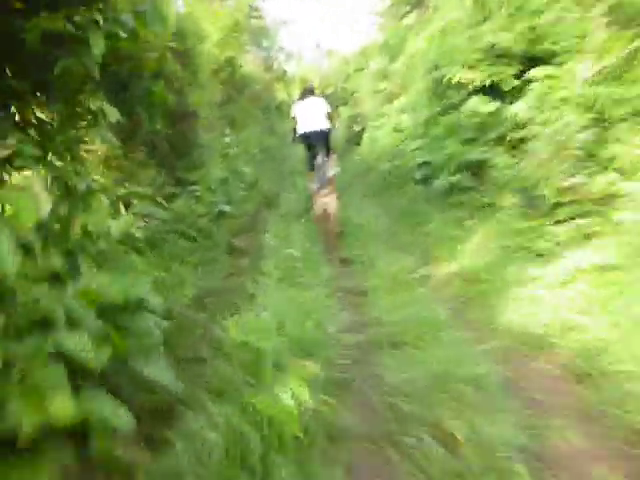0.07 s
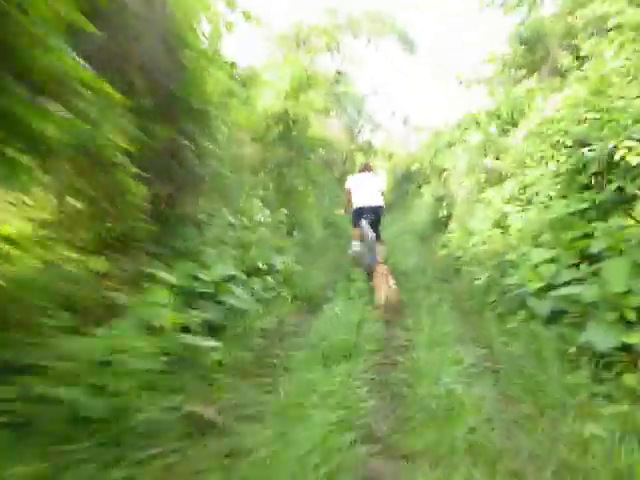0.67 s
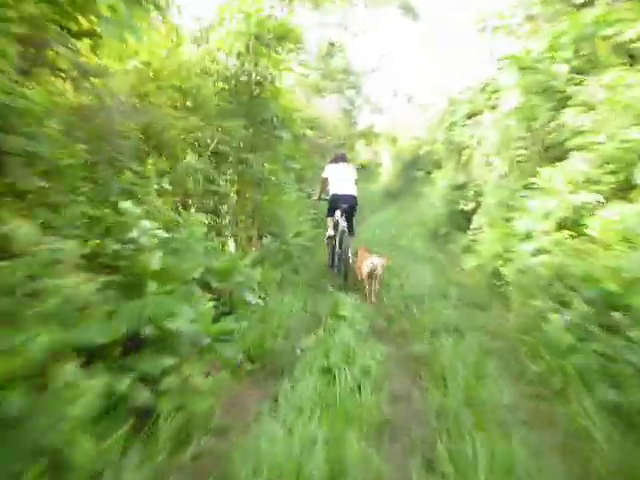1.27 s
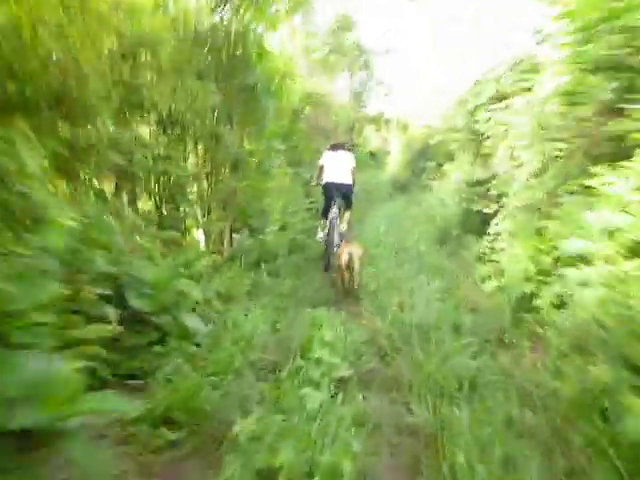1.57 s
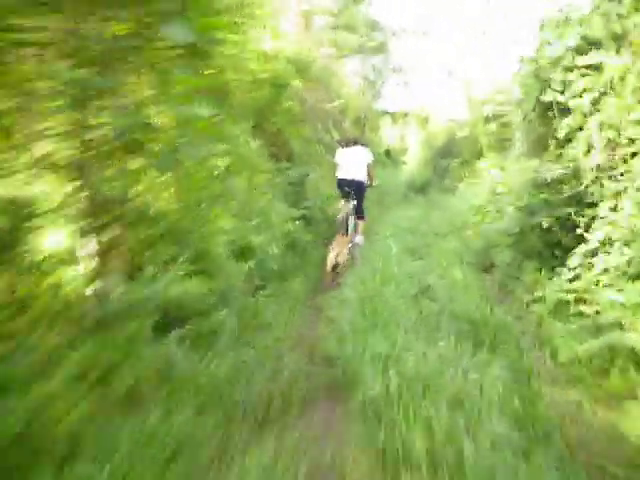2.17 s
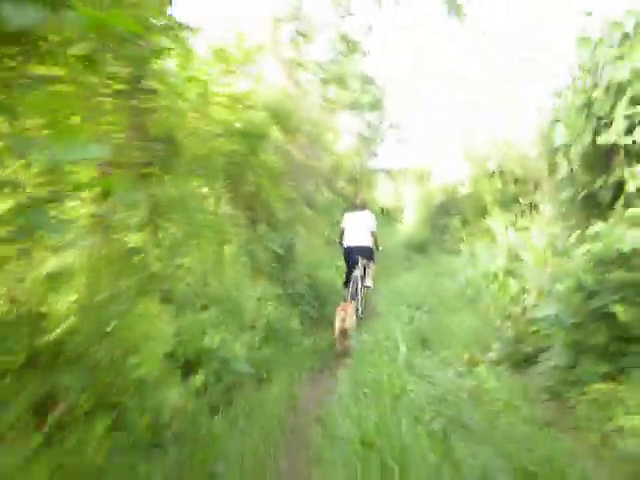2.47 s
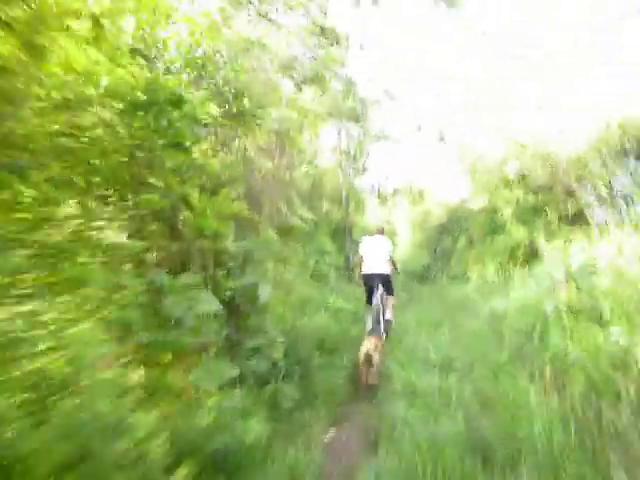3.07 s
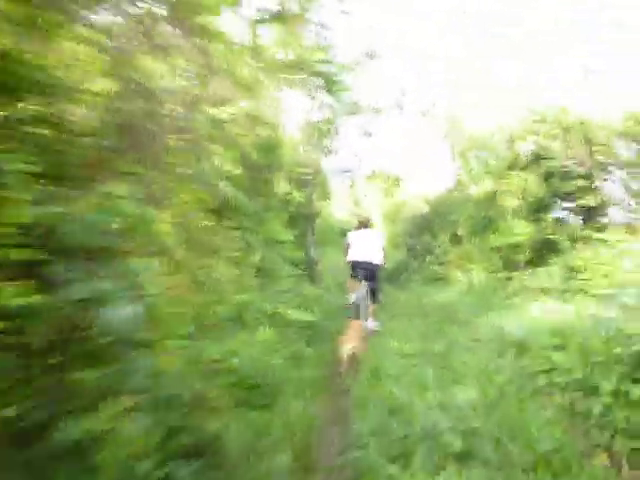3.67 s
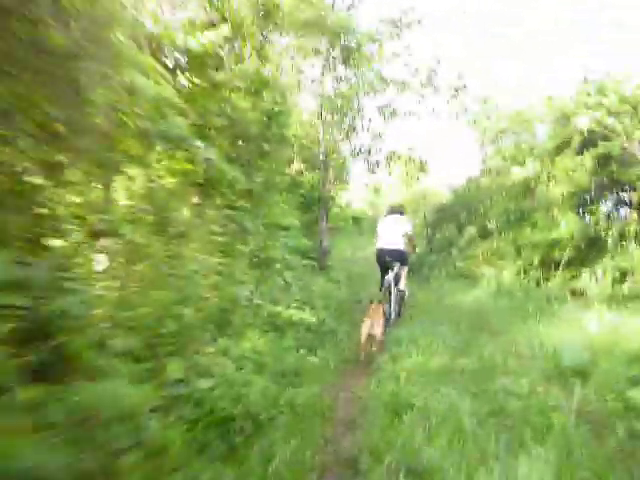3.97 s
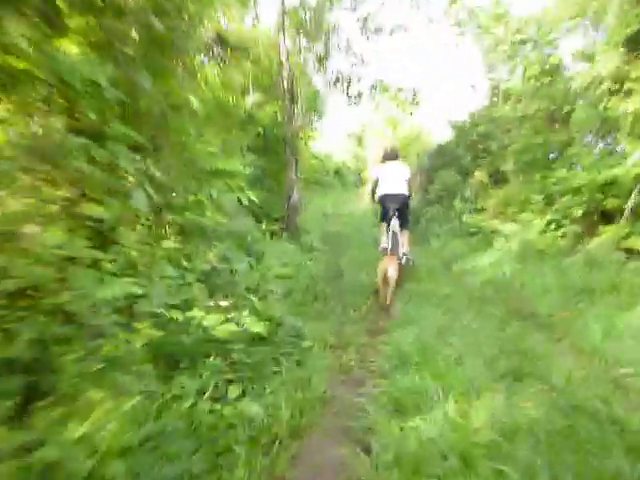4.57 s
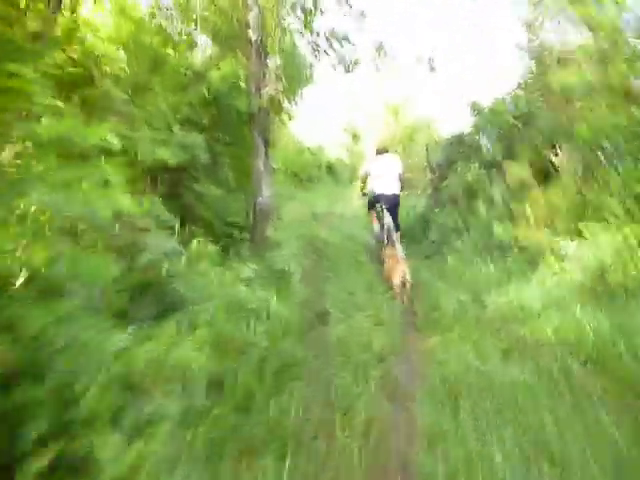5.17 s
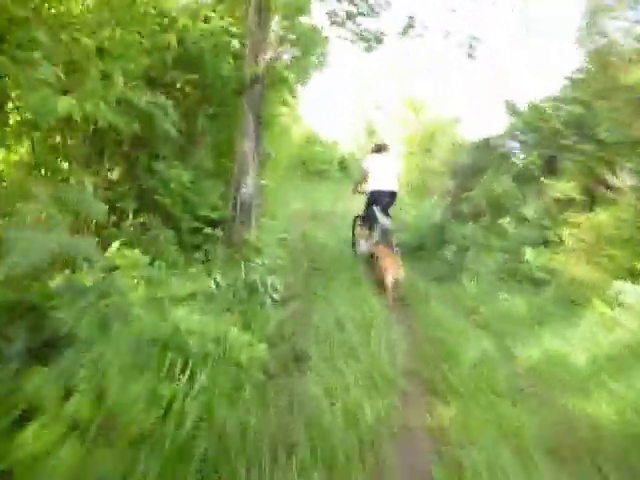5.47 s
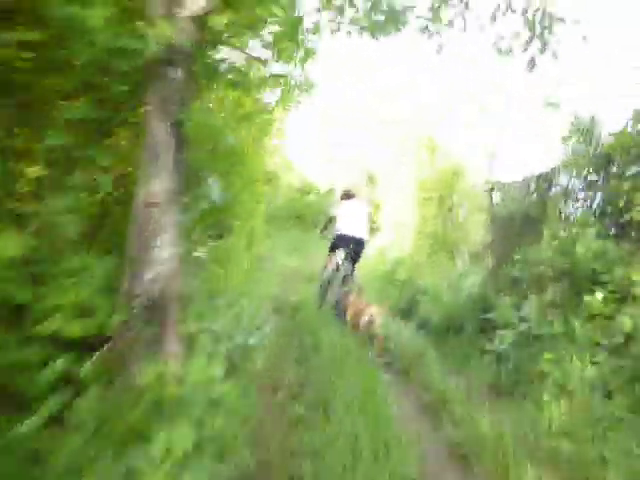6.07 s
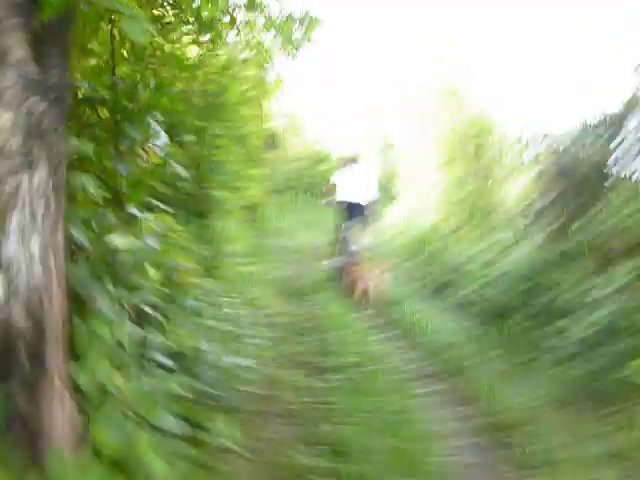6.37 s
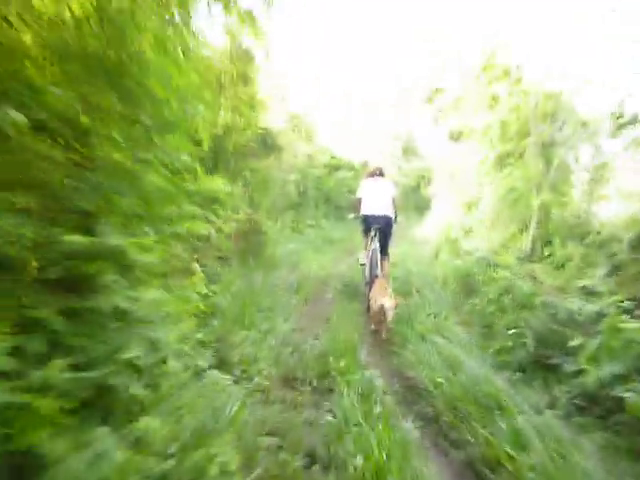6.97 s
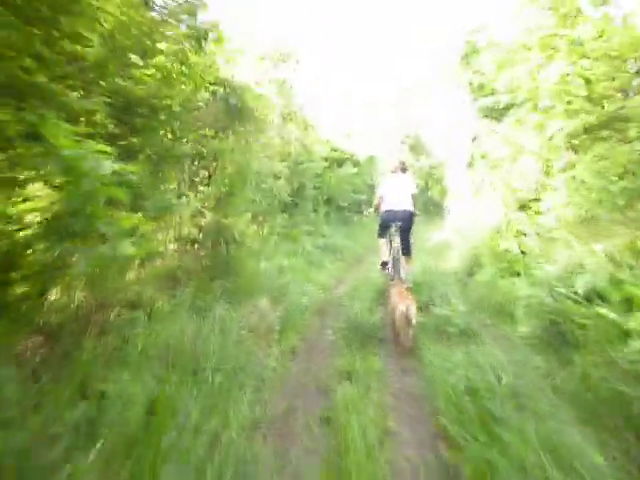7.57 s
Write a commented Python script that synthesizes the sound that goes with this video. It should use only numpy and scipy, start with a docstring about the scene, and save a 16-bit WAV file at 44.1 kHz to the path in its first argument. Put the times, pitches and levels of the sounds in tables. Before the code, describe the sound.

Wind hits a microphone on a moving bicycle from the first moment, in short, uneven low thumps and flutters with dull pops. Beneath it, close and much quieter, tyres rush over soft ground and grass swishes against the wheels, with tiny snaps of stems. A small hard part gives high, irregular ticks throughout, sharpest around 0.8 and 4.6 seconds. At about 1.3 seconds a strong pop coincides with stem snaps and two light knocks. The wind dips from 1.6 to 2 seconds, buffets heavily until 3, and dips again around 3.5. More gusts follow, strongest near 4.8, 5.5 and 6.6 seconds. A few very faint, brief bike squeaks come between 4.5 and 6.2 seconds. From about 6.9 seconds the wind eases, leaving ticks, grass and tyres clearer, with two small gusts before the end near 7.8 seconds.

```python
"""Wind thumps and flutters right on the microphone of a camera riding on a bicycle.
Gusts buffet the capsule and single eddies pop on its port. Underneath, close by, the tyres rush
along an overgrown track and grass swishes and snaps against the wheels. A small hard part ticks
at the bumps; the bike knocks and squeaks a little. The camera has three notches in its midrange."""
import sys
import numpy as np
from scipy import signal
from scipy.fft import rfft, irfft, next_fast_len
from scipy.io import wavfile
from scipy.ndimage import uniform_filter1d

SR = 44100
rng = np.random.default_rng(int(sys.argv[2]) if len(sys.argv) > 2 else 0)


def to_wav(sig):
    """Store sig (one row per channel, or 1-D mono) as 16-bit WAV at the path in sys.argv[1].

    Samples outside -1..1 are clipped; the rate is SR.
    """
    pcm = np.clip(np.atleast_2d(sig), -1, 1) * 32767
    pcm = np.round(pcm).astype(np.int16)
    wavfile.write(sys.argv[1], SR, pcm.T)  # frames by channels


N = 344421
TIME = np.arange(N) / SR


# Light airflow over the microphone: time_s, level_db
LIGHT_AIRFLOW = [(0, -33.5), (0.9, -37), (1.5, -36), (1.62, -47.5), (1.98, -41), (2.1, -33), (3.0, -34.5),
                 (3.45, -52), (3.8, -35), (4.13, -43.5), (4.4, -42), (5.05, -30), (5.33, -37), (5.8, -35),
                 (6.8, -39), (6.9, -50), (7.3, -45.5), (7.81, -39)]
# Gusts straight onto the microphone: start_s, hold_s, buffet_db, flutter_re_buffet_db
MIC_GUSTS = [(0.0, 0.023, -20, -16), (0.098, 0.039, -21, -20), (0.206, .12, -29, -18.5),
             (0.434, 0.12, -29.5, -10), (0.744, 0.037, -23, -23), (0.984, 0.044, -19, -13),
             (1.288, .055, -24.5, -12), (1.413, 0.11, -29.5, -27), (2.038, 0.048, -24, -11),
             (2.128, .055, -22, -16), (2.199, 0.068, -26, -9), (2.337, 0.22, -24.5, -9.5),
             (2.62, 0.042, -29.5, -12.5), (2.726, 0.017, -23.5, -9.5), (2.893, 0.12, -24.5, -10.5),
             (3.191, 0.03, -23, -16), (3.318, 0.021, -22.5, -20), (3.681, 0.048, -25, -13),
             (3.82, 0.044, -28.5, -11.5), (4.249, 0.02, -20.5, -13), (4.332, 0.033, -32.5, -16),
             (4.482, 0.01, -30.5, -25), (4.608, 0.018, -31.5, -15), (4.79, .055, -20.5, -12.5),
             (4.907, 0.043, -25.5, -15.5), (5.078, 0.069, -26, -13.5), (5.179, .03, -24, -9),
             (5.426, 0.14, -20.5, -11.5), (5.985, 0.086, -23, -20), (6.214, 0.01, -26, -13),
             (6.256, 0.045, -24, -14), (6.323, 0.0063, -26, -11), (6.451, .11, -24.5, -16.5),
             (6.607, 0.074, -28.5, -12), (6.732, 0.072, -25.5, -15), (7.497, 0.0091, -25.5, -11),
             (7.737, 0.054, -28, -12.5)]
# Spectrum of the low buffeting on the capsule: frequency_hz, level_db
BUFFET_SPECTRUM = [(20, -31), (40, -17), (80, -3.5), (140, 1.5), (240, -3), (350, -15), (600, -41.5)]
# Spectrum of the flutter above it: frequency_hz, level_db
FLUTTER_SPECTRUM = [(200, -10), (330, 3.5), (430, -1), (600, -12.5), (850, -20.5), (1300, -36)]

def wind(attack_s=0.0082, release_s=0.02, buffet_gain_db=0.5, airflow_flutter_db=-14):
    """Gusts on the microphone ride on a light airflow: low buffeting with a higher flutter."""
    airflow_db = in_time(LIGHT_AIRFLOW)
    buffet_power = from_db(airflow_db) ** 2
    flutter_power = from_db(airflow_db + airflow_flutter_db) ** 2
    for start, hold, db, flutter_db in MIC_GUSTS:
        rise = np.clip(1 + (TIME - start) / attack_s, 0, 1)
        fall = np.exp(-np.clip((TIME - start - hold) / release_s, 0, 20))
        power = (from_db(db) * rise * fall) ** 2
        buffet_power += power
        flutter_power += power * from_db(flutter_db) ** 2
    buffet = turbulence(BUFFET_SPECTRUM, lumpy_db=3.5, lumps_per_s=27.7, steady_s=0.065)
    flutter = turbulence(FLUTTER_SPECTRUM, lumpy_db=7.0, lumps_per_s=67, steady_s=0.08)
    return from_db(buffet_gain_db) * np.sqrt(buffet_power) * buffet + np.sqrt(flutter_power) * flutter


def turbulence(spectrum, lumpy_db, lumps_per_s, steady_s):
    """Pressure on the capsule from a steady stream of small eddies, which arrive in lumps."""
    flow = colour(rng.standard_normal(N), spectrum) * from_db(lumpy_db * drift(lumps_per_s))
    local_power = uniform_filter1d(flow ** 2, int(steady_s * SR) + 1)
    return flow / np.sqrt(local_power + 1e-9)


# The strongest eddies, right at the microphone port: middle_s, level_db, centre_hz
PORT_EDDIES = [(.109, -9.5, 210), (.291, -7, 322), (0.326, -12, 244), (.993, -5.5, 238), (1.032, -13, 250),
               (1.31, -8.5, 260), (1.324, -3.5, 278), (2.041, -13, 240), (2.136, -10.5, 250),
               (2.153, -4.5, 240), (2.433, -7.5, 390), (2.478, -12.5, 320), (2.501, -5, 300),
               (2.732, -8.5, 288), (2.972, -10.5, 330), (3.693, -8, 310), (3.817, -15.5, 377),
               (4.256, -11, 220), (4.284, -12, 230), (4.802, -9.5, 260), (4.847, -7.5, 310),
               (5.477, -7.5, 300), (5.541, -8.5, 240), (6.016, -10.5, 167), (6.053, -12.5, 212),
               (6.328, -11, 280), (6.53, -11.5, 254), (6.555, -12.5, 330), (6.566, -3.5, 270),
               (6.714, -10.5, 414), (6.75, -9, 264)]

def eddies(spread=2.01, bass_cut_hz=135, gain_db=-3.5):
    """A vortex crossing the port is one push and pull of pressure; the bass cut makes it swing on."""
    out, t = np.zeros(N), np.arange(-SR // 50, SR // 30) / SR
    for (s, db, hz), sign in zip(PORT_EDDIES, rng.choice([-1, 1], len(PORT_EDDIES))):
        place = 2 * np.pi * hz / spread * t   # in radii of the vortex
        pressure = place / (1 + place ** 2) ** 3
        pop = cut(pressure, bass_cut_hz, "high", order=4)
        pop = cut(pop, 2 * hz, "low", order=1)
        add(out, s + t[0], sign * from_db(db + gain_db) * pop / np.abs(pop).max())
    return out


# Spectrum of the grass brushing the wheels, heard from the bike: frequency_hz, level_db
SWISH_SPECTRUM = [(900, -15.5), (1500, -5), (2300, 1.5), (3200, 0), (4000, -3), (5400, -4.5), (6500, -1.5),
                  (7200, -4), (8000, -9.5), (9000, -12.5)]
# Spectrum of the tyres on soft ground: frequency_hz, level_db
TYRE_SPECTRUM = [(25, 10.5), (100, 10), (250, 5.5), (390, -0.5), (520, 5), (740, -1), (900, 1), (1150, -4),
                 (1500, -14.5), (2200, -19.5)]

def grass_and_tyres(blades_per_s=700, crackle_db=-6.0, swish_gain_db=3, rush_gain_db=8.5):
    """Blades flick against tyres and spokes over a smooth swish; the tyres rush on the soft ground."""
    swish_db, tyre_db = ride_levels()
    crowding = from_db(swish_db - swish_db.mean() + 3 * drift(25))
    flicks = 0
    for band_hz in ([1800, 3830], [3000, 5050], [4800, 10700]):   # thick stems low, thin blades high
        struck = (rng.random(N) < blades_per_s * crowding / SR) * rng.choice([-1, 1], N)
        strength = from_db(3.5 * np.minimum(rng.exponential(1, N), 5))
        flicks += cut(struck * strength, band_hz, "band")
    swish = colour(rng.standard_normal(N) + from_db(crackle_db) * rms_one(flicks), SWISH_SPECTRUM)
    rush = colour(rng.standard_normal(N), TYRE_SPECTRUM)
    patches = drift(28)   # patchy grass moves both levels together
    swish *= from_db(swish_db + swish_gain_db + 2.09 * patches)
    rush *= from_db(tyre_db + rush_gain_db + 2.14 * patches)
    return swish + rush


# Grass swish along the track: time_s, level_db
SWISH_CURVE = [(0.0, -57), (0.54, -55), (0.67, -53), (1.57, -56.5), (1.91, -52), (2.22, -57), (3.11, -54),
               (3.5, -49), (3.74, -52.5), (4.22, -49.5), (5.0, -57), (5.31, -54.5), (5.79, -56.5),
               (6.42, -50), (6.55, -54), (6.94, -56), (7.46, -51.5), (7.81, -53.5)]
# Tyre rush along the track: time_s, level_db
TYRE_CURVE = [(0.0, -51), (0.52, -52), (0.78, -47), (1.63, -54), (1.91, -50), (2.81, -53.5), (3.74, -47),
              (5.07, -55), (5.33, -52.5), (5.83, -56), (6.46, -51), (6.85, -56.5), (7.33, -50),
              (7.81, -51.5)]
# Thick tufts under the wheels: middle_s, length_s, swish_change_db, tyre_change_db
GRASS_TUFTS = [(0.174, 0.054, 4, 13.5), (0.285, 0.087, 0.5, 5), (0.79, 0.24, 2.5, -1.5),
               (1.285, 0.14, 1.5, 5.5), (2.055, .12, 4, 7), (2.974, 0.03, -1.5, 9.5), (3.539, .09, 2.5, 4),
               (3.69, 0.04, -2.5, 7), (3.83, .06, 5, 4.5), (4.069, 0.12, 3, -1), (4.209, 0.065, 0.5, 8.5),
               (4.37, 0.044, 4, 3), (4.699, .27, 2, 4.5), (5.236, 0.12, 2, 1), (5.387, .05, 5.5, 7),
               (6.495, 0.21, 2.5, 4.5)]

def ride_levels():
    """Levels of swish and tyre rush in dB; both shift, mostly up, as the wheels push through a tuft."""
    swish_db, tyre_db = in_time(SWISH_CURVE), in_time(TYRE_CURVE)
    for s, length, swish_change_db, tyre_change_db in GRASS_TUFTS:
        depth = np.maximum(1 - (2 * (TIME - s) / length) ** 2, 0)
        swish_db += swish_change_db * depth
        tyre_db += tyre_change_db * depth
    return swish_db, tyre_db


# A loose hard part ticking near the microphone: start_s, level_db, pitch_hz
PART_TICKS = [(0.0643, -35.5, 6500), (0.315, -36, 6000), (0.3865, -37, 6300), (0.5584, -35, 6320),
              (0.8228, -24, 6520), (1.1398, -36.5, 6350), (1.285, -32.5, 6300), (1.4356, -33.5, 6500),
              (1.5279, -32.5, 6460), (2.0887, -31.5, 6370), (2.856, -33, 6760), (3.192, -33, 6290),
              (3.3446, -27.5, 6600), (3.6216, -30.5, 6670), (3.9777, -27.5, 6600), (4.57, -23, 6800),
              (4.6551, -25.5, 6500), (4.7526, -29, 6600), (5.1013, -32, 6630), (6.054, -29.5, 6540),
              (6.2622, -32, 6270), (6.5819, -36, 6330), (6.93, -28, 6560), (7.0369, -30, 6550),
              (7.1843, -33, 6360), (7.3926, -38, 6230), (7.5537, -29.5, 6440), (7.6435, -26.5, 6500),
              (7.74, -27, 6230)]
# Ringing modes of that part: pitch_ratio, level_db, t60_s
PART_MODES = [(.41, -3, 0.0077), (0.541, 7, 0.011), (0.986, 3, 0.0075), (1.109, 2.5, 0.0031)]

def ticks(gain_db=-1.5, bounce_db=-18, low_modes_db=-13, detune=0.021, contact_s=0.00011):
    """Each touch rings the small part for a few milliseconds; a weak bounce follows."""
    out, t = np.zeros(N), np.arange(SR // 50) / SR
    for s, db, hz in PART_TICKS:
        ring = np.zeros(len(t))
        for ratio, mode_db, t60 in PART_MODES:
            if ratio < 1 / np.sqrt(2):
                mode_db += low_modes_db
            mode_hz = hz * ratio * (1 + detune * rng.standard_normal())
            ring += from_db(mode_db - 60 * t / t60) * np.sin(2 * np.pi * mode_hz * t)
        ring *= 1 - np.exp(-t / contact_s)   # the contact takes a moment to build
        bounce_delay_s = 0.003 + 0.0007 * rng.standard_normal()
        add(out, s, from_db(db + gain_db) * ring)
        add(out, s + bounce_delay_s, from_db(db + bounce_db) * ring)
    return out


# Stems snapping against the bike, close by: start_s, level_db, t60_s, centre_hz
STEM_SNAPS = [(0.3343, -33.5, .055, 4800), (.495, -27, .015, 4400), (.727, -26.5, 0.037, 3500),
              (.965, -34, .035, 3500), (1.312, -20, 0.042, 2300), (1.379, -26.5, 0.047, 3100),
              (1.722, -24.5, 0.016, 4500), (2.424, -27, .014, 4300), (3.012, -31, 0.013, 3500),
              (3.299, -29, .02, 3500), (3.379, -20, .007, 3200), (3.585, -29, 0.04, 4500),
              (3.791, -37, .012, 3300), (4.999, -30, .012, 3600), (5.383, -27.5, .03, 2900),
              (5.88, -28, .009, 3500), (6.51, -24.5, .025, 2600), (7.463, -25, 0.021, 2700),
              (7.685, -25, .008, 5000)]

def snaps(gain_db=-9.0, band_ratio=1.13):
    """A stem strikes the wheel with a short burst of crackle, lower for thicker stems."""
    out, t = np.zeros(N), np.arange(SR // 12) / SR
    for s, db, t60, hz in STEM_SNAPS:
        burst = rng.standard_normal(len(t))
        crackle = rms_one(cut(burst, [hz / band_ratio, hz * band_ratio], "band", order=1))
        add(out, s, from_db(db + gain_db - 60 * t / t60) * crackle)
    return out


# The bike knocking over ruts, under the camera: start_s, level_db, pitch_hz
RUT_KNOCKS = [(0.15, -38.5, 840), (1.313, -36, 894), (1.378, -34, 873), (3.522, -40.5, 1000),
              (3.815, -44, 760), (5.381, -40, 930), (6.508, -39, 1010), (6.99, -44, 1000),
              (7.187, -42.5, 1125)]

def knocks(t60_s=0.033, gain_db=10.0, rattle_db=-9.5):
    """A jolt rings the bike briefly at one pitch, with a dull rattle."""
    out, t = np.zeros(N), np.arange(SR // 10) / SR
    for s, db, hz in RUT_KNOCKS:
        rattle = rms_one(cut(rng.standard_normal(len(t)), [600, 1700], "band"))
        body = np.sin(2 * np.pi * hz * t) + from_db(rattle_db) * rattle
        add(out, s, from_db(db + gain_db - 60 * t / t60_s) * body)
    return out


# Faint, close squeaks from the bike: middle_s, level_db, pitch_hz, length_s
BIKE_SQUEAKS = [(4.501, -43, 1927, .034), (5.397, -46, 1930, .022), (6.177, -42, 2632, .016),
                (4.815, -50, 3110, .022)]

def squeaks(rise=0.017, roughness=0.049, gain_db=3.0):
    """Brief rubbing tones that swell, rise slightly with an unsteady pitch and fade."""
    out = np.zeros(N)
    for s, db, hz, length in BIKE_SQUEAKS:
        progress = np.linspace(-0.5, 0.5, int(length * SR))
        waver = roughness * drift(300)[:len(progress)]
        phase = 2 * np.pi * np.cumsum(hz * (1 + rise * progress + waver)) / SR
        swell = np.cos(np.pi * progress) ** 2
        add(out, s - length / 2, from_db(db + gain_db) * swell * np.sin(phase))
    return out


def stray_stems(stems_per_s=24, gain_db=6, size_db=3.5, t60_s=0.0073, max_stems=400):
    """Light stems flick the spokes at random, each a tiny burst of crackle in a band of its own."""
    out, t = np.zeros(N), np.arange(SR // 40) / SR
    swish_db, _ = ride_levels()
    starts = np.flatnonzero(rng.random(N) < stems_per_s / SR)
    stems = rng.random((max_stems, 2))
    bursts = rng.standard_normal((max_stems, len(t)))
    for start, (size, pitch), burst in zip(starts, stems, bursts):
        hz = 2800 * 2 ** (1.2 * pitch)
        crackle = cut(burst * from_db(-60 * t / t60_s), [hz / 1.5, hz * 2.0], "band", order=1)
        heft = min(-np.log(1 - size), 3)   # many light stems, few heavy ones
        db = swish_db[start] + gain_db + size_db * heft
        add(out, start / SR, from_db(db) * crackle / np.abs(crackle).max())
    return out


def from_db(db):
    """Decibels to gain."""
    return 10 ** (np.asarray(db) / 20)


def rms_one(x):
    """Scale to rms 1."""
    return x / np.sqrt(np.mean(x ** 2) + 1e-20)


def in_time(curve):
    """A curve of (time_s, value) points at every sample."""
    return np.interp(TIME, *np.transpose(curve))


def add(out, s, sound):
    """Mix a short sound in, starting at time s."""
    start = max(round(s * SR), 0)
    out[start:start + len(sound)] += sound[:max(N - start, 0)]


def drift(rate_hz):
    """Smooth random wander with spread 1."""
    hop, settle = 40, 2000
    pole = np.exp(-2 * np.pi * rate_hz * hop / SR)
    noise = rng.standard_normal(N // hop + settle + 2)
    slow = signal.lfilter([1], [1, -2 * pole, pole * pole], noise)[settle:]
    return np.interp(np.arange(N) / hop, np.arange(len(slow)), rms_one(slow))


def colour(x, spectrum):
    """Give a signal a spectrum that falls 20 dB an octave past either end; rms 1."""
    size = next_fast_len(N + SR // 10)
    hz, db = np.transpose(spectrum)
    bins = np.maximum(np.arange(size // 2 + 1) * SR / size, 1)
    octaves_beyond = np.abs(np.log2(bins / np.clip(bins, hz[0], hz[-1])))
    gain = from_db(np.interp(np.log(bins), np.log(hz), db) - 20 * octaves_beyond)
    return rms_one(irfft(rfft(x, size) * gain, size)[:N])


def cut(x, hz, kind, order=2):
    """Butterworth filter."""
    sections = signal.butter(order, np.clip(hz, 10, 0.45 * SR), kind, fs=SR, output="sos")
    return signal.sosfilt(sections, x + 1e-18)


def scene():
    """One microphone on the bike, in the open air, with everything close to it."""
    mix = wind() + eddies() + grass_and_tyres() + ticks() + snaps() + knocks() + squeaks()
    return (mix + stray_stems())[None]


# Notches in the camera's midrange: centre_hz, width_hz
CAMERA_NOTCHES = [(1400, 300), (1599, 410), (2151, 236)]

def record(dry, ceiling=0.36, roll_off_hz=7420, cutoff_hz=8800):
    """The microphone rounds the strongest pops; the camera notches the midrange and cuts the top."""
    out = ceiling * np.tanh(dry / ceiling)
    for hz, width_hz in CAMERA_NOTCHES:
        out = signal.lfilter(*signal.iirnotch(hz, hz / width_hz, fs=SR), out)
    out = cut(out, roll_off_hz, "low", order=10)
    return signal.sosfilt(signal.ellip(10, 0.2, 90, cutoff_hz, fs=SR, output="sos"), out)


dry = scene()
out = record(dry)
to_wav(out)
```